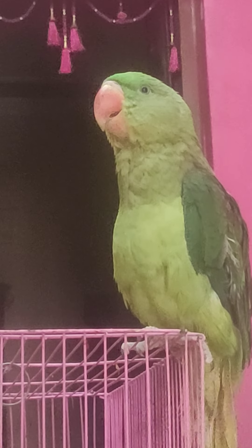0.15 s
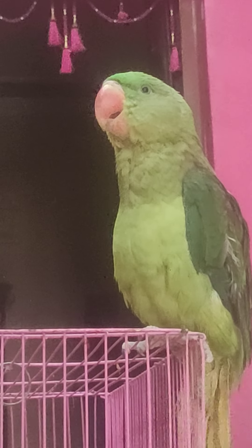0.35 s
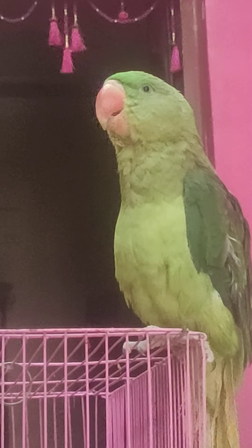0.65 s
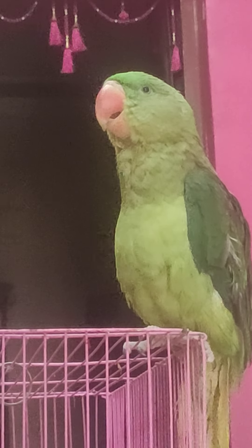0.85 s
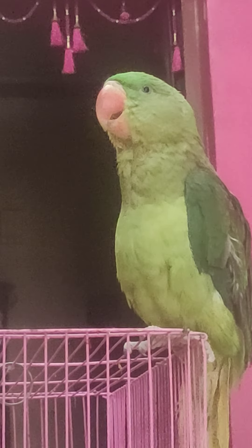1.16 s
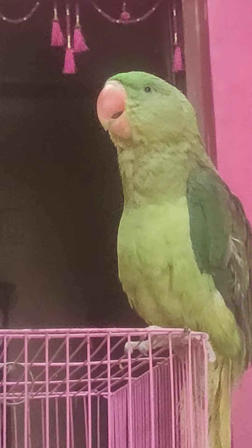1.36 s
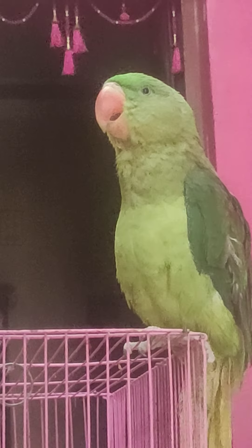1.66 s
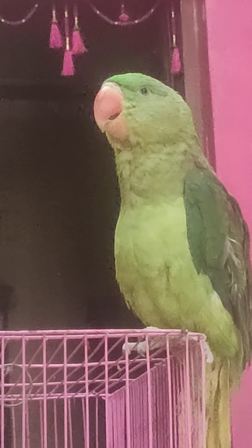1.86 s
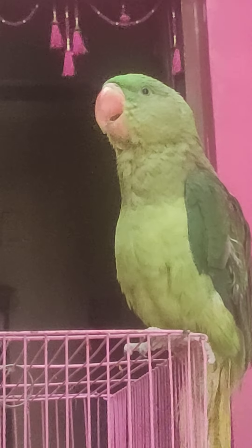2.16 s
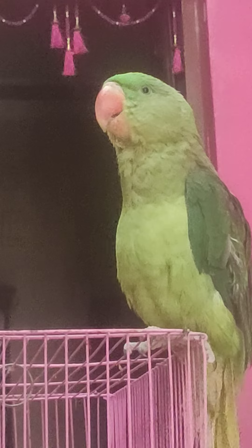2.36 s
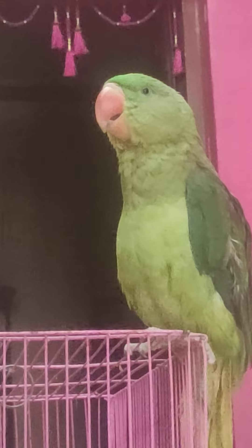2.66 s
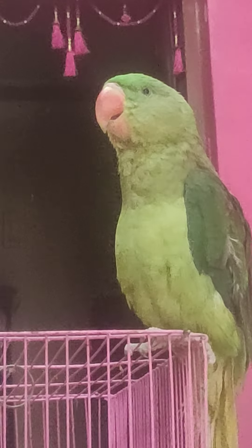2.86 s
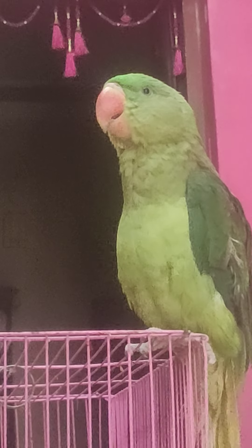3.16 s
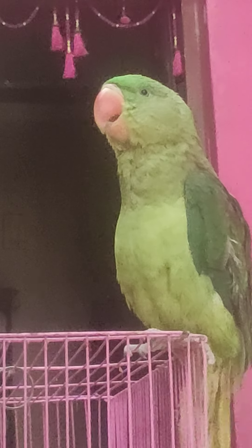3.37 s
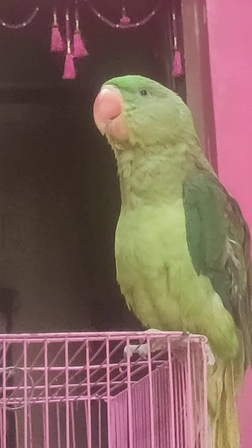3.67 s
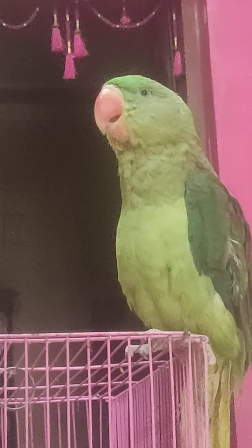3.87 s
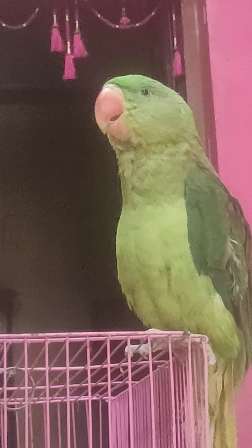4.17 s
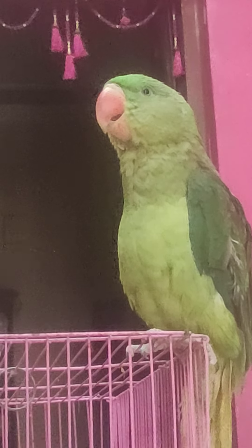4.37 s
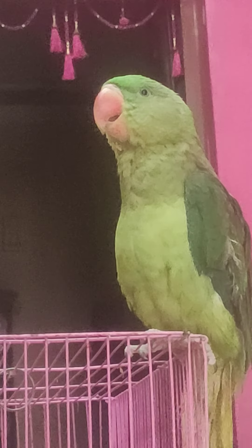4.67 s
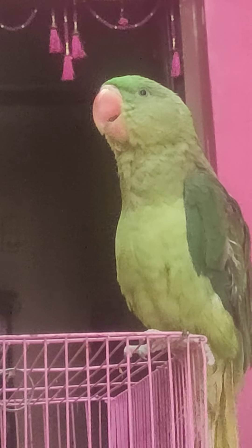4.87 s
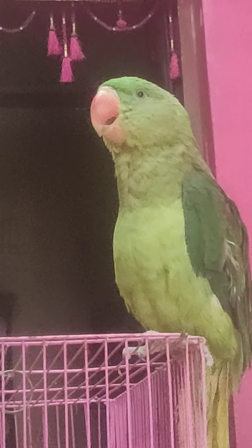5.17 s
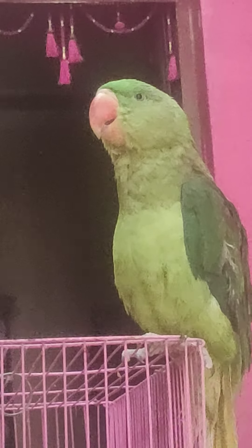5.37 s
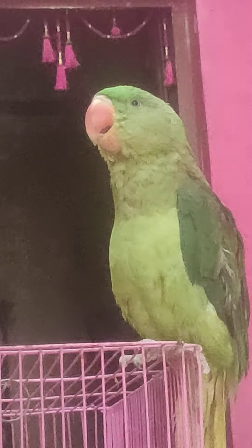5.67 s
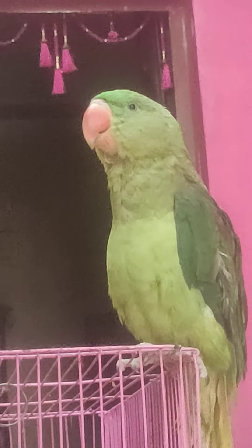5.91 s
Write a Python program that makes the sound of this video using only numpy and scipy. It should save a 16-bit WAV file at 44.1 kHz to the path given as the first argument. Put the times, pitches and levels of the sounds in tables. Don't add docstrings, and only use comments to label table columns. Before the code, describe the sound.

A parrot close to a phone squawks throughout in a small, bare, hard-walled room. The fading echo of an earlier call opens the scene. At 0.25 s a squawk rises in steps; at 0.65 a steep swoop climbs from low; at 1.0 a tiny grunt runs into a longer swoop held until 1.3. Further calls come at about 1.55, 2.05, 2.45, 2.8, 3.3, 3.75, 4.15, 4.6, 5.05 and 5.5, with a last one starting just before 6. Each lasts around 0.15 to 0.25 s, bright, nasal and rich in overtones, with a rough breathy start; many finish in a quick upward flick, highest near 3.9. Short echoes smear the glides and fill the gaps. Quiet room and street rumble and faint mains hum continue below. Soft, low finger thuds and slight shaking of the phone occur between 4.25 and 4.95 s. Treble is dull above 8 kHz.

```python
import sys
import numpy as np
from scipy import signal
from scipy.fft import rfft, irfft
from scipy.io import wavfile
from scipy.ndimage import uniform_filter1d

SR = 44100
rng = np.random.default_rng(int(sys.argv[2]) if len(sys.argv) > 2 else 0)


def volts_from_db(level):
    exponent = np.asarray(level, float) / 20
    return 10 ** exponent


def generate_wav(sig):
    pcm = np.round(np.clip(np.atleast_2d(sig).T, -1, 1) * 32767).astype(np.int16)
    wavfile.write(sys.argv[1], SR, pcm)


N = 266496
LEAD = SR // 4


def evened(x):
    return x / np.sqrt(np.mean(x ** 2) + 1e-20)


def read(points, hz):
    f, value = np.transpose(points)
    return np.interp(np.log(hz + 1), np.log(f + 1), value)


def add(mix, s, sound):
    part = mix[LEAD + round(s * SR):][:len(sound)]
    part += sound[:len(part)]


def resonate(x, hz, width_hz):
    r = np.exp(-np.pi * width_hz / SR)
    poles = [1, -2 * r * np.cos(2 * np.pi * hz / SR), r * r]
    once = signal.lfilter([1], poles, x)
    return signal.lfilter([1], poles, once)


def rumble():
    # hz, level_db (per Hz)
    floor_spectrum = [(16, -27.5), (40, 3.5), (75, -4.5), (150, -11), (300, -15.5), (480, -17.5),
                      (680, -34.5), (1000, -27.5), (1600, -33.5), (2400, -35.5), (3800, -39.5),
                      (5500, -41.5), (7600, -51.5), (8600, -84)]
    rumble_db, hum_db = -51, -64
    frames, hz = N // 256 + 5, np.fft.rfftfreq(1024, 1 / SR)
    a, b, patches = rng.standard_normal((frames, 513, 3)).T
    patches = uniform_filter1d(patches, size=6, axis=0)
    patches = evened(uniform_filter1d(patches, size=12, axis=1))
    z = (a + 1j * b) * volts_from_db(read(floor_spectrum, hz)[:, None] + 1.4 * patches)
    noise = signal.istft(z, nperseg=1024, noverlap=768)[1][:N]
    hum = resonate(rng.standard_normal(N), hz=98.7, width_hz=3.9)
    return volts_from_db(rumble_db) * evened(noise) + volts_from_db(hum_db) * evened(hum)


def hand():
    # start_s, peak_db, ring_hz
    bumps = [
        (4.265, -39, 103),
        (4.352, -39.5, 209),
        (4.487, -38.5, 217),
        (4.527, -41.5, 180),
        (4.789, -41.5, 240),
        (4.892, -39, 186),
    ]
    # middle_s, half_length_s, level_db
    shakes = [
        (4.4, .13, -44.5),
        (4.616, 0.084, -50),
        (4.849, .07, -50),
    ]
    out, t = np.zeros(N + LEAD), np.arange(3000) / SR
    for s, peak_db, hz in bumps:
        fade = volts_from_db(peak_db - 60 * t / 0.099)
        onset = np.minimum(t / 0.004, 1)
        add(out, s, fade * np.sin(2 * np.pi * hz * t) * onset)
    clock = np.arange(N) / SR
    level = sum(volts_from_db(db) * np.exp(-((clock - s) / half) ** 2) for s, half, db in shakes)
    shaking = evened(resonate(rng.standard_normal(N), hz=40, width_hz=25))
    return out[LEAD:] + level * shaking


def room(x):
    # hz, t60_s
    ring_time = [(500, 0.26), (1000, 0.35), (2000, 0.28), (4000, 0.29), (6000, 0.3), (8000, 0.29)]
    # hz, level_db
    echo_colour = [(500, -2), (1000, -12), (1500, -9), (2200, 6), (3200, 2.5), (4500, -5), (6000, -1),
                   (8000, -5)]
    # delay_s, level_db
    walls = [(.0021, -12.5), (.0057, -24.5), (.0094, -8.5), (.0138, -8.5), (.019, -9)]
    taps, spacing = np.zeros(SR), 20
    at = np.arange(500, SR - spacing, spacing)
    taps[at + rng.integers(0, spacing, len(at))] = rng.choice([-1., 1.], len(at))
    hz, t, z = signal.stft(taps, SR, nperseg=256)
    decay = volts_from_db(-60 * t / np.clip(read(ring_time, hz), .05, 2)[:, None])
    decay /= np.sqrt((decay ** 2).sum(1, keepdims=True) * 128 / spacing)
    tail = signal.istft(z * decay, SR, nperseg=256)[1][:SR]
    for s, db in walls:
        tail[round(s * SR)] += volts_from_db(db)
    tail = irfft(rfft(tail) * volts_from_db(read(echo_colour, np.fft.rfftfreq(SR, 1 / SR))), SR)
    return signal.fftconvolve(x, tail)[:len(x)]


def controls(pitch, level_db, boost_db, beak, peak, start_db, start_beak, end_db, end_beak, count=80):
    level_share = 0.2
    s, hz = np.transpose(pitch)
    t = np.linspace(s[0], s[-1], count)
    u, peak = (t - s[0]) / (s[-1] - s[0]), np.clip(peak, .1, .95)
    before = np.clip(1 - u / peak, 0, 1) ** 1.74
    after = np.clip((u - peak) / (1 - peak), 0, 1) ** 2.58
    slack_db = start_db * before + end_db * after
    attack_s, release_s, release_db, swell_db = 0.0089, 0.013, -6, 0.5
    level_db = level_db + level_share * slack_db + swell_db * (u - .5)
    level_db += 0.42 * start_db * np.exp(-(t - s[0]) / attack_s)
    level_db += release_db * np.exp((t - s[-1]) / release_s)
    hz = np.interp(t, s, hz)
    flick_db, flick_beak, flick_hz_per_s = -4.5, -7.5, 8400
    flick = np.clip(np.gradient(hz, t) / flick_hz_per_s, 0, 1) ** 2 * (u > peak)
    boost_db = boost_db + (1 - level_share) * slack_db + flick_db * flick
    low_db = 9 * np.minimum(np.log2(hz / 930), 0)
    level_db, boost_db = level_db + low_db, boost_db - low_db
    beak = beak + start_beak * before + end_beak * after + flick_beak * flick
    return np.transpose([t, hz, level_db, boost_db, beak])


def squawk(rows, tongue_db, rasp):
    # hz, level_db
    throat = [(500, 0), (1500, -8.5), (2100, -3.5), (2700, -7), (3300, -6), (3800, -1.5), (4400, -1),
              (5300, 2.5), (5750, -4), (6050, -6), (6500, -9.5), (7200, -4.5), (7800, -17), (8600, -58.5)]
    pulse_db = [-0.5, -1, 1, -2.5, -7, 0.5, -5, -10]
    tongue_hz = [2130, 3323, 4560, 5240, 7200]
    # hz, level_db
    breath_colour = [(700, -35), (1500, -22), (2500, -6.5), (4000, -6), (5300, 12.5), (6100, -11),
                     (7200, 15), (7900, -21.5), (8600, -48)]
    s, *columns = np.transpose(rows)
    t = np.arange(s[0], s[-1] + 0.0048, 1 / SR)
    since = t - t[0]
    hz, level_db, boost_db, beak = (
        uniform_filter1d(np.interp(t, s, c), size=120, mode="nearest") for c in columns)
    boost_db = boost_db - np.clip(-np.gradient(hz) * SR / 1500 - 4, 0, 14)
    wobble, drift, air = rng.standard_normal((3, SR // 2))[:, :len(t)]

    settle_s, settled_hz = .02, 950
    unsettled = np.exp(-since / (settle_s * max(settled_hz / hz[0], 1)))
    jitter = .002 * rasp * (1 + 3 * unsettled)
    hz = hz * (1 + jitter * evened(uniform_filter1d(wobble, size=120)))
    flutter_hz = 305 * (1 + .04 * evened(uniform_filter1d(drift, size=900)))
    flutter_depth = .06 * rasp * (1 + 0.22 * unsettled)
    flutter = flutter_depth * np.sin(2 * np.pi * np.cumsum(flutter_hz) / SR)

    phase = 2 * np.pi * np.cumsum(hz) / SR
    k = np.arange(2, 18)[:, None]
    order_db = np.pad(pulse_db, (0, len(k) - len(pulse_db)), mode="edge")[:, None]
    colour_db = order_db + read(throat, k * hz) + beak * np.log2(k * hz / 3500)
    colour_db += read(list(zip(tongue_hz, tongue_db)), k * hz)
    shimmer_db = 2.5
    shimmer = uniform_filter1d(rng.standard_normal((len(k), SR // 2)), size=400, axis=1)[:, :len(t)]
    colour_db += shimmer_db * rasp * evened(shimmer)
    waves = np.cos(k * (phase + flutter) - k * k)
    overtones = (volts_from_db(colour_db) * (k * hz < 9000) * waves).sum(0)
    voice = np.cos(phase + 0.62 * flutter) + volts_from_db(boost_db) * overtones

    air = irfft(rfft(air) * volts_from_db(read(breath_colour, np.fft.rfftfreq(len(t), 1 / SR))), len(t))
    breath_db, first_puff_db = -20.5, 20.5
    breath_db = breath_db + boost_db + beak + first_puff_db * unsettled
    swoop_db, swoop_s = 11, 0.05
    swoop = since / swoop_s
    breath_db += swoop_db * max(settled_hz / hz[0] - 1, 0) * swoop * np.exp(1 - swoop)
    voice += rasp * volts_from_db(breath_db) * evened(air) * (1 + 0.53 * np.cos(phase))

    edge = np.clip(np.minimum(since / .006, (t[-1] - t) / .008), 0, 1) ** 2
    return s[0], np.sqrt(2) * volts_from_db(level_db) * voice * edge


def parrot():
    # time_s, pitch_hz
    squawks = [
        [(-.2, 1055), (-.12, 1124), (-.004, 1078)],
        [(.25, 911), (.282, 966.5), (.326, 1001), (.368, 1074), (.4, 1084), (.428, 1147), (.464, 1077)],
        [(.644, 501), (.66, 695), (.714, 988), (.754, 1041), (.786, 1191), (.816, 1190), (.83, 1020)],
        [(1.0, 471), (1.004, 483)],
        [(1.02, 533), (1.03, 602.5), (1.05, 872), (1.066, 953), (1.094, 1026), (1.138, 1043), (1.156, 1084),
         (1.284, 1065), (1.296, 1028)],
        [(2.824, 816), (2.856, 890), (2.898, 1005), (2.926, 1021), (2.97, 1113), (3.026, 1066), (3.054, 1072)],
        [(4.14, 975), (4.156, 965), (4.194, 1041), (4.222, 1085), (4.274, 1057), (4.325, 1046), (4.334, 1228)],
        [(5.055, 860), (5.085, 915), (5.097, 950), (5.131, 1032), (5.157, 1053), (5.183, 1134), (5.237, 1100)],
    ]
    # time_s, pitch_hz
    more_squawks = [
        [(1.537, 913), (1.569, 951), (1.615, 1051), (1.669, 1120), (1.703, 1177), (1.747, 1169), (1.773, 1267),
         (1.789, 1267)],
        [(2.029, 1070), (2.045, 961), (2.105, 1008), (2.175, 1022), (2.192, 1084), (2.21, 1220), (2.225, 1206)],
        [(2.455, 985), (2.465, 884), (2.501, 945.4), (2.575, 1020), (2.585, 992), (2.599, 1310), (2.607, 1057)],
        [(3.272, 931), (3.284, 915), (3.306, 936.4), (3.322, 979.5), (3.4, 1042), (3.458, 1013), (3.466, 1270)],
        [(3.75, 953), (3.756, 911), (3.794, 987), (3.854, 1135), (3.87, 1144), (3.888, 1240), (3.904, 1410)],
        [(4.58, 1460), (4.592, 939), (4.684, 1010), (4.712, 1116), (4.744, 1108), (4.756, 1224), (4.772, 1165)],
        [(5.502, 986), (5.528, 1009), (5.622, 1148), (5.636, 1174), (5.652, 1168), (5.672, 1328), (5.686, 1190)],
        [(5.956, 1044), (5.966, 938.4), (5.98, 921.5), (6.002, 904), (6.034, 1006), (6.08, 1093)],
    ]
    # fundamental_db, overtone_boost_db, beak_db_per_octave, peak_moment_0_to_1,
    # tongue_db
    efforts = [ (-31, 3, 1, 0, 2.6), (-40.5, 5.5, 0, 0.39, 1.4), (-41, 3.5, -4.5, 0.4, 3),
               (-29.5, -3, -1, 0.2, -5), (-39.5, 4, -2.5, 0.9, 2.4), (-39, 6, -2.5, 0.53, 1.4),
               (-39, 5.5, -0.5, 0.5, 0.6), (-38, 4.5, .3, 0.66, 3), (-38.5, 10, 4.5, 0.55, 2.7),
               (-36.5, 7.5, 2.5, 0.53, 1.6), (-37.5, 6.5, 3.5, 0.4, 1.7), (-40, 7.5, 5, 0.16, 1.6),
               (-39.5, 7, 2.5, 0.53, 2), (-37, 6, 3.5, 0.66, 0.9), (-39.5, 6.5, 5, 0.4, 3),
               (-39, 6.5, 3, 1, 0.5), ]
    # start_db, start_beak_db_per_octave, end_db, end_beak_db_per_octave
    shapes = [ (-7.5, 5, -15, -6), (-13, -4, -10.5, -6), (-11.5, -6.5, -10, -12), (-8, -5, -4.5, -4.5),
              (-1, -1, -3, -4), (-16.5, -1.5, -6.5, -0.5), (-16, -9, -8.5, -12), (-4, -3.5, -13, 1),
              (-21, -13.5, -8.5, 3), (-12, -2.5, -9.5, 2.5), (-13, -6, -1, -5.5), (-4, -16.5, -11.5, -1.5),
              (-4, -4, -13, -12), (-6, -7.5, -7, -7), (-7, -8, -5.5, -13.5), (-11.5, -3.5, -4, 10), ]
    tops_db = [0, -1.5, 2.5, 6, -0.5, 1.2, -3.5, 0.5, -1.2, -0.5, 1, -2.5, 1.2, 3, -0.2, -1.3]
    rasps = [.6, .9, 1.4, 1, 1.1, 1.5, 1.0, 1.3, .9, .7, 1.2, 1.1, 1.1, 1.2, 1.2, 1.3]
    tongue_shares = [-0.61, 1.3, -2.1, -1.1]
    bird = np.zeros(N + LEAD)
    pitches = sorted(squawks + more_squawks)
    for pitch, (*effort, tongue), shape, top_db, rasp in zip(pitches, efforts, shapes, tops_db, rasps):
        tongue_db = np.append(tongue * np.array(tongue_shares), top_db)
        add(bird, *squawk(controls(pitch, *effort, *shape), tongue_db, rasp))
    return bird


def scene():
    bird = parrot()
    bird_in_room = (bird + room(bird))[LEAD:]
    return (bird_in_room + rumble() + hand())[None]


def roll_off(x):
    return signal.sosfilt(signal.butter(12, 8600, fs=SR, output="sos"), x)


def record(dry):
    edge_hz, shelf_db, bass_hz = 7750, -13, 28
    taps = signal.firwin(255, edge_hz, window=("kaiser", 6), fs=SR)
    cut = signal.oaconvolve(dry, taps[None], "same")
    cut = cut + volts_from_db(shelf_db) * (dry - cut)
    cut = signal.sosfilt(signal.butter(2, bass_hz, "highpass", fs=SR, output="sos"), cut)
    return roll_off(cut)


dry = scene()
out = record(dry)
generate_wav(out)
```